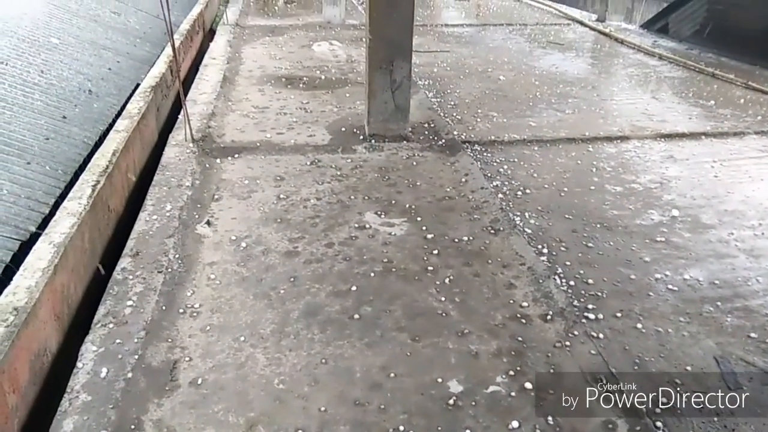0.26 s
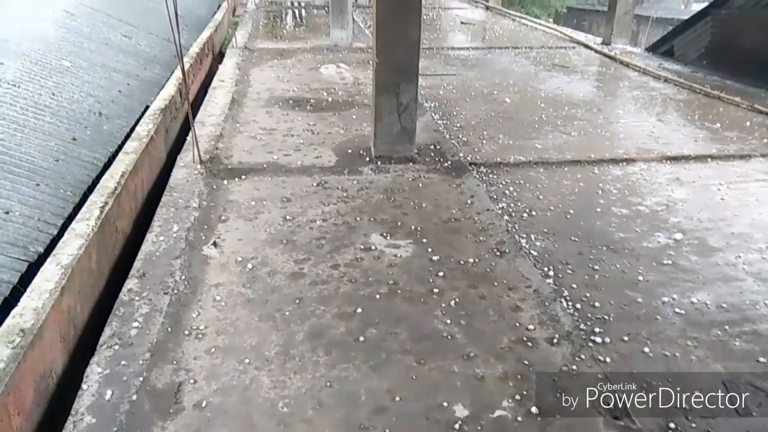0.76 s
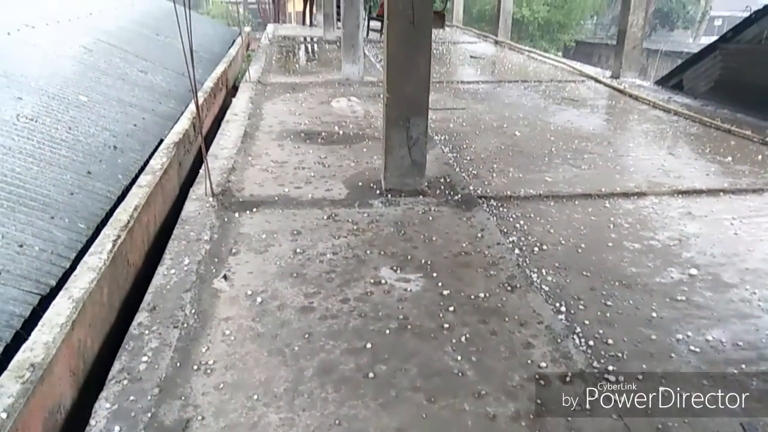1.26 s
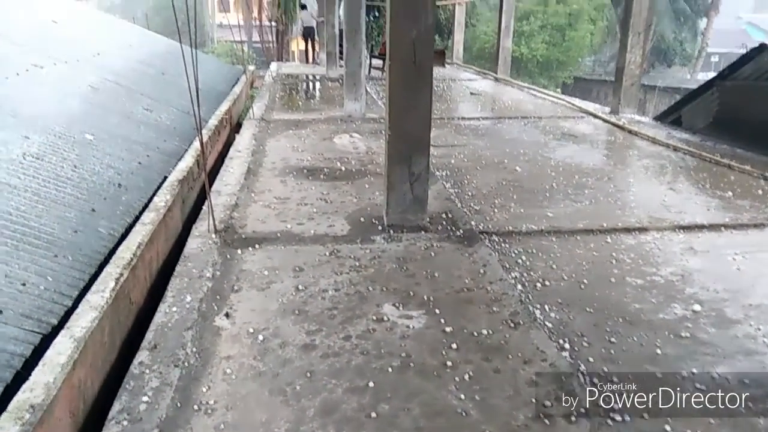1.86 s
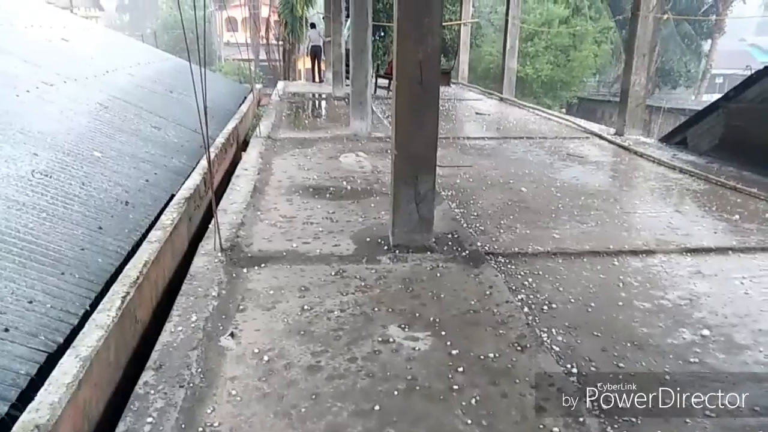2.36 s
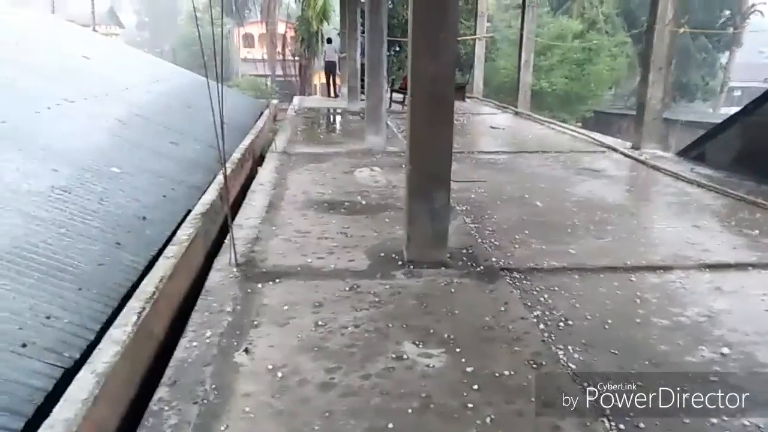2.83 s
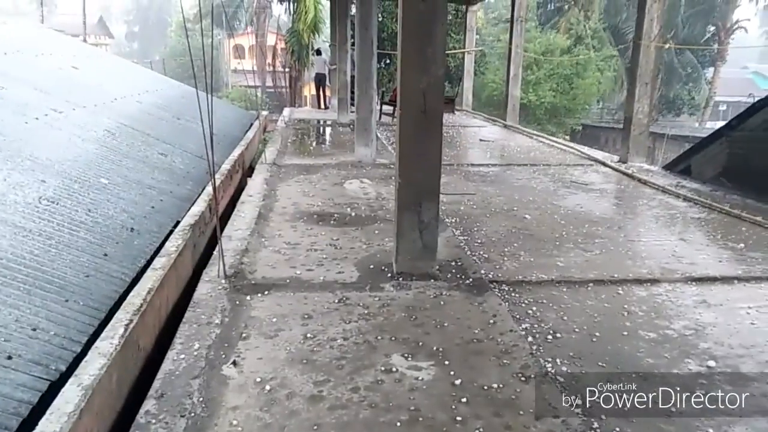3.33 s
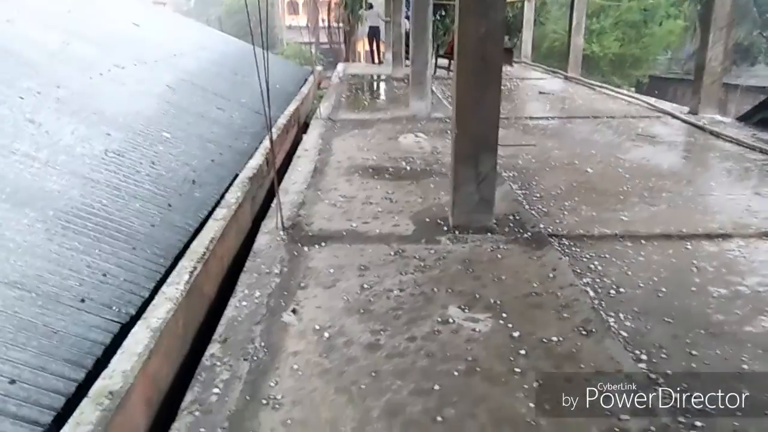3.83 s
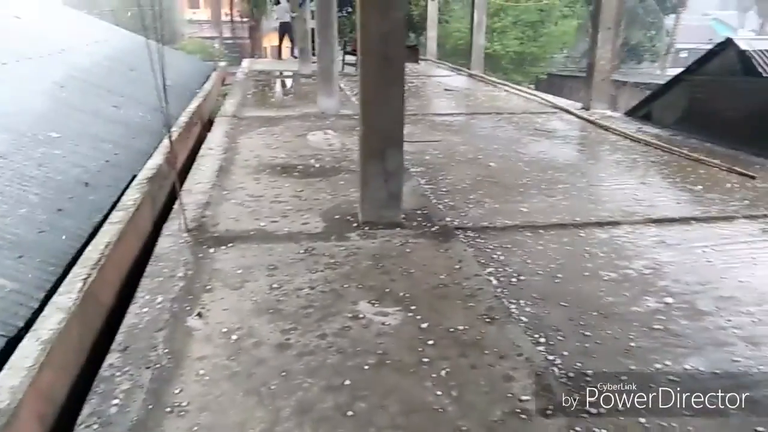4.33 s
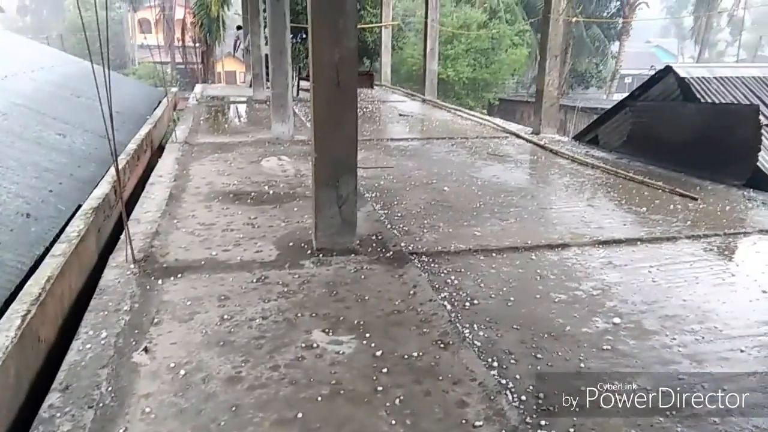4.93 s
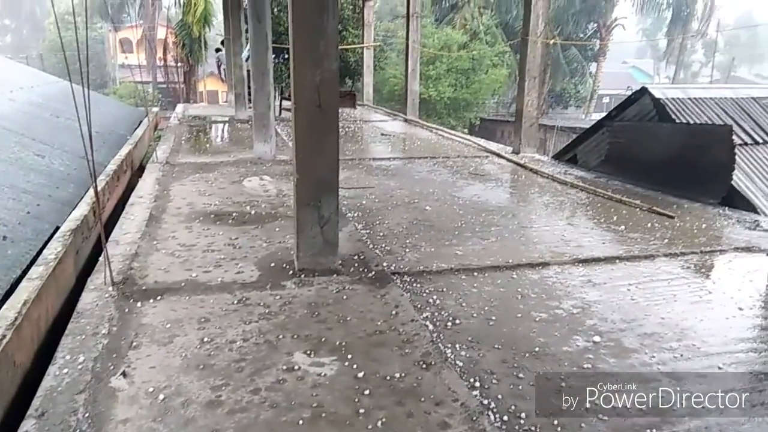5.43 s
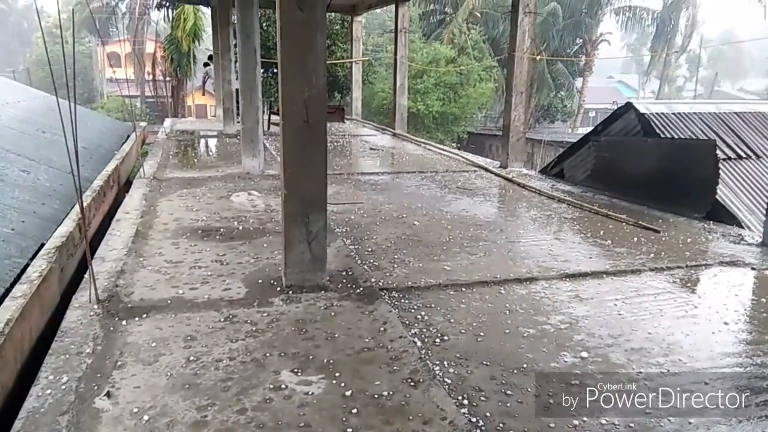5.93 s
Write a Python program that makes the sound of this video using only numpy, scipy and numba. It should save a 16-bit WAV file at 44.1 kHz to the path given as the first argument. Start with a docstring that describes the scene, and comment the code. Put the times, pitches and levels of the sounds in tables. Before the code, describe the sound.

Outdoors under a terrace cover, a loud wash of rain and small ringing hailstones fills everything from the first moment. Large stones clank irregularly on sheet metal, many each second, and others burst crisply on the concrete with scattering chips. Low drumming is faint beneath. The phone sound is squashed and band-limited, blanks out suddenly late on, then resumes somewhat softer with sparser clanks.

```python
"""Under a covered concrete terrace beside corrugated sheet roofs, a phone hears hail and heavy rain.
From the start, far rain (smooth noise) and small stones (ringing bursts) merge into roar, rumble and spray.
Large stones soon clank in the sheet, each a knock and a rattle; others splatter brightly close by.
A near wall echoes the bass throughout, and the phone cuts both ends of the range and limits the peaks.
Late on, the sound drops out for half a second; the roar then returns a few dB lower."""
import sys
import numpy as np
from scipy import signal
from scipy.fft import rfft, irfft
from scipy.io import wavfile
from scipy.ndimage import uniform_filter1d, minimum_filter1d
from numba import njit

SR = 44100
rng = np.random.default_rng(int(sys.argv[2]) if len(sys.argv) > 2 else 0)


def wav_out(sig):
    """Save sig, one row per channel (or a flat mono array), as 16-bit PCM at SR to the path in sys.argv[1]."""
    wavfile.write(sys.argv[1], SR, np.round(np.clip(np.atleast_2d(sig).T, -1, 1) * 32767).astype(np.int16))


N = 272979

# The steady downpour, rms levels ahead of wall and phone, joined by straight lines:
# time_s, roar_db, rumble_db, spray_db
DOWNPOUR = [(0, -16.5, -30, -56), (.5, -17.5, -35, -34.5), (1.14, -16.5, -34.5, -33),
            (1.75, -16.5, -32, -38), (2.15, -17.5, -32.5, -34), (2.72, -17.5, -37.5, -37),
            (2.9, -18.5, -37.5, -42), (2.95, -15, -35, -30), (3.18, -17, -34, -44),
            (3.3, -15.5, -34, -35.5), (3.66, -20, -34.5, -34), (4.28, -21, -48.5, -29.5),
            (4.76, -19.5, -42.5, -32.5), (5.1, -21.5, -38.5, -38), (5.3, -18, -41, -36),
            (5.49, -24.5, -37.5, -44), (5.56, -20, -38, -38), (5.84, -19.5, -38, -35.5),
            (6.19, -23, -44.5, -33)]
# Spectral shape of the rain on the roofs: frequency_hz, relative_db (per Hz)
ROAR_SPECTRUM = [(250, -21.5), (400, -30), (560, -10), (730, -2.5), (1000, -2.5), (1400, -3), (1850, -1.5),
                 (2200, -6.5), (2900, -7.5), (3300, -13), (4200, -10), (5500, -21.5), (7500, -35.5),
                 (14000, -39)]
# Spectral shape of the drumming sheets: frequency_hz, relative_db (per Hz)
RUMBLE_SPECTRUM = [(20, -23.5), (40, -9), (60, 3), (105, -3), (135, 3.5), (220, 2.5), (330, 0), (450, 6.5),
                   (600, -17)]
# Spectral shape of the hiss on wet concrete: frequency_hz, relative_db (per Hz)
SPRAY_SPECTRUM = [(2500, -1), (4500, 1.5), (6500, -1.5), (14200, -7.5)]
# Large stones on the sheet: start_s, knock_peak_db, pitch_hz, rattle_db (against the knock)
SHEET_HITS = [(0.064, -8, 982, -12), (0.09, -10, 820, -13), (0.108, -5, 1210, -14), (0.147, -8, 920, -13),
              (0.232, -15.5, 842, -2), (0.263, -9, 920, -12), (0.341, -16, 1550, -11),
              (0.364, -9, 1500, -9), (0.413, -7, 840, -8), (0.433, -10, 1130, -8), (0.479, -12, 1040, -3),
              (0.514, 0.5, 1810, -17), (0.554, -2, 1780, -18), (0.576, -3, 1670, -8),
              (0.597, -10, 1310, -11), (0.619, -2.5, 1044, -9), (0.658, -7.5, 1870, -13),
              (0.754, -10, 1790, -5), (0.797, -12.5, 1010, -8), (0.829, -7, 1060, -6),
              (0.845, -6, 1050, -7), (0.867, -7, 1080, -2.5), (0.905, -10.5, 1030, -4),
              (0.935, -7.5, 1060, -13), (0.987, -13, 875, -5), (1.011, -5.5, 1020, -6.5),
              (1.052, -9, 824, -6), (1.067, -8, 2180, -9), (1.168, -9.5, 2170, -15),
              (1.196, -4.5, 1470, -8.5), (1.235, -9.5, 740, -8.5), (1.265, -16, 745, -11),
              (1.307, -14, 2570, -6), (1.328, -12, 1840, -11), (1.437, -10.5, 608, -10.5),
              (1.501, -3, 970, -9), (1.544, -10, 925, -15), (1.564, -16, 1750, -13), (1.602, -7, 1770, -9),
              (1.638, 1, 1740, -14.5), (1.675, -9, 1070, -17), (1.717, -10, 1080, -17),
              (1.736, 1, 1790, -13), (1.76, 0.5, 1850, -27), (1.803, -7.5, 1750, -4.5),
              (1.872, -9, 1700, -5), (1.944, -9.5, 1730, -4), (1.979, -10, 734, -6),
              (2.015, -7.5, 880, -8.5), (2.081, -10, 775, -15), (2.15, -15, 2050, -3),
              (2.184, -11, 1560, -5), (2.284, -13, 1050, -11), (2.308, -2, 1620, -17),
              (2.341, -9.5, 1160, -6), (2.398, -10.5, 960, -12), (2.44, 0, 1180, -11.5),
              (2.46, -8, 1720, -2), (2.469, -6, 1770, -6.5), (2.505, -11, 1010, -2),
              (2.519, -7.5, 1870, -2.5), (2.573, -4.5, 1850, -3), (2.582, -5, 1930, -13),
              (2.622, 1.5, 1780, -6), (2.639, -8, 1940, -17), (2.663, -3, 1860, -10), (2.699, -3, 1160, -2),
              (2.698, 2.5, 1550, -9), (2.736, -0.5, 1760, -8.5), (2.749, -1, 1290, -16),
              (2.917, -10.5, 865, -2), (2.947, -7, 2170, -11.5), (2.972, -5.5, 2130, -8),
              (3.006, -5, 1990, -11), (3.088, -11.5, 2350, -9), (3.145, 4.5, 1720, -10.5),
              (3.162, -2, 1930, -15.5), (3.178, 2.5, 1770, -11), (3.222, -3, 2000, -11),
              (3.246, 0, 1500, -10.5), (3.274, -6.5, 1250, -9), (3.328, -9, 1616, -11.5),
              (3.401, -9.5, 1700, -11), (3.422, -8, 1380, -10), (3.447, -9.5, 721, -9),
              (3.489, -7, 1680, -9), (3.542, -10.5, 1950, -12.5), (3.584, -13.5, 1370, -11),
              (3.634, -5, 1570, -9), (3.649, -4.5, 1784, -8), (3.672, -5, 1700, -7.5),
              (4.291, -13, 1075, -1.5), (4.321, -5.5, 1380, -8.5), (4.343, -11.5, 1450, -8),
              (4.402, -18, 850, -2), (4.457, -8, 1240, -10), (4.508, -16, 1280, -19), (4.693, -14, 910, -6),
              (4.714, -8.5, 1330, -7.5), (4.765, -14, 1820, 0.5), (4.807, -14.5, 755, -8),
              (4.918, -9.5, 1880, -8), (4.93, -9, 1810, -7.5), (4.956, -12, 1850, -13),
              (5.134, -5, 1410, -15), (5.144, -2, 1830, -13), (5.169, -10, 1810, -4.5),
              (5.186, -4.5, 1540, -6), (5.209, -10.5, 820, -6.5), (5.299, -22, 1850, -7),
              (5.376, -14, 1380, -11), (5.449, -14, 1900, -22), (5.517, -6.5, 830, -5),
              (5.522, -3, 1404, -11), (5.547, -16, 1000, -13), (5.607, -13, 736, -8),
              (5.619, -13.5, 746, -12), (5.719, -8.5, 2370, -5), (5.73, -13, 726, -4),
              (5.741, -14, 1570, -10), (5.75, -9, 1900, -9.5), (5.782, -3, 1840, -7.5),
              (5.832, -12, 1890, -9), (5.903, -10, 1370, -13), (5.938, -11, 785, -8),
              (5.979, -10, 1800, -5.5)]
# Stones that burst close by: start_s, level_db (nominal peak of the hiss), scatter_db (against the hiss)
CLOSE_HITS = [(0.0747, -15, -6), (0.1087, -12, -10), (0.168, -11.5, -7), (0.2508, -16, -7),
              (0.4524, -17.5, -1), (0.5132, -11.5, -12), (0.5464, -15, -7), (0.7914, -21, -5),
              (0.8264, -18, -5), (0.919, -12, -7), (1.005, -5.5, -9.5), (1.0524, -11.5, -4),
              (1.1935, -11.5, -4), (1.4294, -21, -4), (1.4874, -15, -5), (1.6794, -19, -10),
              (1.8654, -15, -7), (1.9314, -17, -5), (1.9505, -12, -5), (2.0224, -21, -7),
              (2.0617, -16, -11), (2.203, -14, -6), (2.2764, -16, -9), (2.4394, -15.5, -4),
              (2.5194, -17.5, -5), (2.9174, -9, -10), (2.9774, -15, -6), (3.2454, -14, -4),
              (3.275, -13.5, -3), (3.3324, -13, -7), (3.3667, -9.5, -8.5), (3.488, -15, -15),
              (3.5628, -16, -4), (3.5934, -17, -8), (4.252, -13.5, -5), (4.2914, -15.5, -9),
              (4.4034, -16.5, 2.5), (4.5057, -11.5, -9), (4.5605, -12, -6), (4.6249, -15, -4),
              (4.6724, -22, -17), (4.7064, -18, -1), (4.7654, -18, 1), (4.7915, -12, -4), (4.8863, -18, 2),
              (5.1534, -18, -2), (5.1831, -17, -6), (5.2714, -17.5, 2), (5.3724, -17, -3.5),
              (5.5354, -23, -5), (5.5854, -19.5, -8), (5.6101, -18, -14), (5.6734, -18.5, 0),
              (5.7194, -15.5, -11), (5.7818, -17, -2), (5.8364, -19, -5), (5.882, -15.5, 2),
              (5.994, -16.5, -6)]
# The silent stretch: start_s, end_s
DROPOUT = 3.6948, 4.2449

KNOCK_WIDTH_HZ, GRIT_T60_S, GRIT_RE_KNOCK_DB = 220, 0.039, -19
RATTLE_WIDTH_HZ, RATTLE_T60_S = 358, 0.16
SHEET_HZ, SHEET_WIDTH_HZ, SHEET_T60_S, SHEET_RE_RATTLE_DB = 1200, 1820, 0.1, -3.5
SPLAT_HZ, SPLAT_WIDTH_HZ, CRACK_OVER_HISS_DB = 6370, 9800, 9.5
HISS_T60_S, SCATTER_T60_S = 0.079, 0.45
RING_HZ, RING_WIDTH_HZ = 4400, 900
# Echo delay, a deeply cancelled frequency at the centre of the band, its reach and greatest echo share
WALL_DELAY_S, WALL_HZ, WALL_OCTAVES, WALL_SHARE = 0.0067, 374.2, 0.81, 0.88


def undb(db):
    """Turn decibels into an amplitude factor."""
    return 10 ** (np.asarray(db) / 20)


def unit(x):
    """Scale to an rms of one."""
    return x / np.sqrt(np.mean(x ** 2))


def bin_frequencies():
    """Frequencies of the transform bins in Hz, raised by 1 Hz to keep logarithms finite."""
    return np.arange(N // 2 + 1) * SR / N + 1


def colour(x, points):
    """Shape a spectrum by (Hz, dB) points joined on a log-frequency axis."""
    hz, db = np.transpose(points)
    shape_db = np.interp(np.log(bin_frequencies()), np.log(hz), db)
    return irfft(rfft(x) * undb(shape_db), N)


@njit
def bursts(noise, start, gain, hz, width, t60, knock, rise):
    """A blow knocks a patch of close modes, which rattles on: click and decaying noise, band-passed twice."""
    y = np.zeros(len(noise))
    for e in range(len(start)):
        g = np.tan(np.pi * hz[e] / SR)
        damping = width[e] / hz[e]
        scale = 1 + g * (g + damping)
        fall = np.exp(-np.log(1000) / (t60[e] * SR))
        level = gain[e] * np.sqrt(2 * SR / np.pi / width[e])
        # The click is sized so that its ring peaks at knock x gain
        click = knock[e] * gain[e] * SR * np.e / (2 * np.pi * width[e])
        band1, low1, band2, low2 = 0., 0., 0., 0.
        first = int(start[e] * SR)
        # Each burst ends after half its t60, with the noise 30 dB down
        for n in range(min(int(t60[e] * SR / 2), len(y) - first)):
            attack = min(n / (rise * SR), 1.)
            x = click + level * attack * noise[(first + n + 7919 * e) % len(y)]
            v = (band1 + g * (x - low1)) / scale
            band1, low1 = 2 * v - band1, low1 + 2 * g * v
            w = (band2 + g * (damping * v - low2)) / scale
            band2, low2 = 2 * w - band2, low2 + 2 * g * w
            y[first + n] += damping * w
            level *= fall
            click = 0.
    return y


def small_stones(count, lo_hz, hi_hz, spread_db, sharp, t60, knock_db):
    """Random blows over the roofs, most small and a few large, even in power per Hz."""
    when, pitch, size, ring = rng.random((count, 4)).T
    hz = lo_hz * (hi_hz / lo_hz) ** pitch
    size_db = np.minimum(-spread_db * np.log(1 - size), 9)
    gain = undb(size_db) * np.sqrt(hz)
    knock = np.full(count, undb(knock_db))
    blows = bursts(rng.standard_normal(N), when * N / SR, gain, hz, hz / sharp,
                   t60 * (.5 + ring), knock, 0.0015)
    return unit(blows)


def roar():
    """Far rain is a smooth wash; nearer stones ring out of it one by one."""
    wash = rng.standard_normal(N)
    stones = small_stones(count=3000, lo_hz=389.2, hi_hz=7080.0, spread_db=1.0,
                          sharp=10.4, t60=0.12, knock_db=3.5)
    return unit(colour(wash + undb(-5.5) * stones, ROAR_SPECTRUM))


def rumble():
    """Whole sheets drum faintly under the load: low noise with broad thuds in it."""
    wash = rng.standard_normal(N)
    thuds = small_stones(count=200, lo_hz=39.8, hi_hz=489.0, spread_db=1.0,
                         sharp=2.7, t60=0.54, knock_db=-8.0)
    return unit(colour(wash + undb(-12.5) * thuds, RUMBLE_SPECTRUM))


def spray():
    """Drops and ice chips hiss on the wet concrete: bright noise with short ticks in it."""
    wash = rng.standard_normal(N)
    chips = small_stones(count=900, lo_hz=3970.0, hi_hz=14100.0, spread_db=2.0,
                         sharp=2.7, t60=0.02, knock_db=7.0)
    return unit(colour(wash + undb(-9.5) * chips, SPRAY_SPECTRUM))


def clanks():
    """Large stones knock out a short clear ring, rattle a patch and shake the whole sheet more broadly."""
    start_s, knock_db, pitch_hz, rattle_re_knock_db = np.array(SHEET_HITS, float).T
    same = np.ones(len(start_s))
    no_click = 0 * same
    rattle_db = knock_db + rattle_re_knock_db
    # The noise is set to the grit level; the click stands above it at the knock level
    knock = bursts(rng.standard_normal(N), start_s, undb(knock_db + GRIT_RE_KNOCK_DB), pitch_hz,
                   KNOCK_WIDTH_HZ * same, GRIT_T60_S * same, undb(-GRIT_RE_KNOCK_DB) * same, 0.0018)
    patch = bursts(rng.standard_normal(N), start_s, undb(rattle_db), pitch_hz,
                   RATTLE_WIDTH_HZ * same, RATTLE_T60_S * same, no_click, 0.0065)
    sheet = bursts(rng.standard_normal(N), start_s, undb(rattle_db + SHEET_RE_RATTLE_DB), SHEET_HZ * same,
                   SHEET_WIDTH_HZ * same, SHEET_T60_S * same, no_click, 0.0014)
    return knock + patch + sheet


def splats():
    """Close stones crack with a short bright hiss, and a ring near 4.4 kHz sounds with each crack; their chips
    scatter with a longer hiss."""
    start_s, level_db, scatter_db = np.array(CLOSE_HITS, float).T
    same = np.ones(len(start_s))
    hiss_rms = undb(level_db) / 4  # noise peaks stand about four times over its rms
    splat_hz, splat_width_hz = SPLAT_HZ * same, SPLAT_WIDTH_HZ * same
    short, click = HISS_T60_S * same, undb(CRACK_OVER_HISS_DB) * same
    crack = bursts(rng.standard_normal(N), start_s, hiss_rms, splat_hz, splat_width_hz, short, click, 0.0011)
    ping = bursts(rng.standard_normal(N), start_s, hiss_rms, RING_HZ * same, RING_WIDTH_HZ * same,
                  short, click, 0.0015)
    scatter = bursts(rng.standard_normal(N), start_s, hiss_rms * undb(scatter_db), splat_hz, splat_width_hz,
                     SCATTER_T60_S * same, 0 * same, 0.006)
    return crack + ping + scatter


def wall(x):
    """A short echo off the near wall cancels evenly spaced bands in the bass, fading out either side."""
    f = bin_frequencies()
    share = WALL_SHARE * np.exp(-(np.log2(f / WALL_HZ) / WALL_OCTAVES) ** 2)
    echo = share * np.exp(-2j * np.pi * (f - WALL_HZ) * WALL_DELAY_S)
    return irfft(rfft(x) * (1 - echo), N)


def scene():
    """Sum the downpour and the single stones on the terrace, with the wall beside them."""
    time_s, *columns = np.transpose(DOWNPOUR)
    t = np.arange(N) / SR
    roar_db, rumble_db, spray_db = (np.interp(t, time_s, column) for column in columns)
    rain = undb(roar_db) * roar() + undb(rumble_db) * rumble() + undb(spray_db) * spray()
    return wall(rain + clanks() + splats())[None]


def limiter(x, top, look_s):
    """Gain eases down just ahead of any peak that would pass the top, and back up after it."""
    k = int(look_s * SR)
    needed_gain = np.minimum(1, top / (np.abs(x) + 1e-9))
    lowest_gain = minimum_filter1d(needed_gain, size=2 * k)
    return x * uniform_filter1d(lowest_gain, size=k)


def record(dry):
    """The phone cuts deep bass, limits the peaks, falls silent for a moment, and cuts the top."""
    t = np.arange(N) / SR
    bass_cut = signal.butter(2, 48., "high", fs=SR, output="sos")
    held = limiter(signal.sosfilt(bass_cut, dry[0]), top=.71, look_s=.003)
    silence_start_s, silence_end_s = DROPOUT
    held = held * ((t < silence_start_s) | (t > silence_end_s))
    # Steep low-pass at 14250 Hz: 0.2 dB ripple below, 80 dB down above
    top_cut = signal.ellip(12, .2, 80, 14250, fs=SR, output="sos")
    return signal.sosfilt(top_cut, held)[None]


dry = scene()
out = record(dry)
wav_out(out)
```